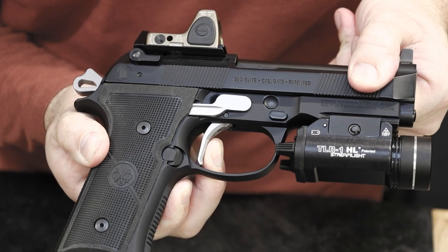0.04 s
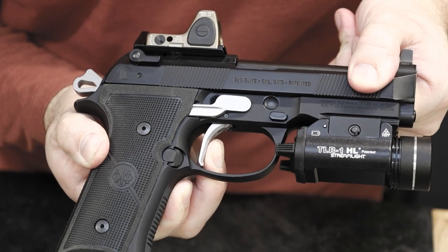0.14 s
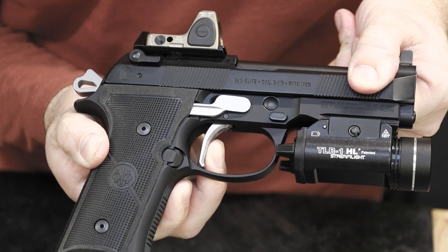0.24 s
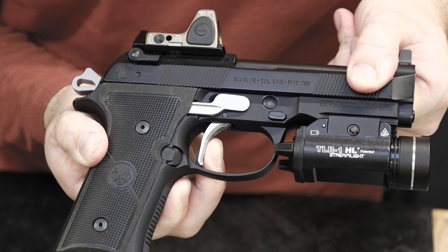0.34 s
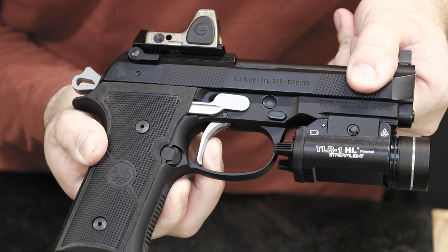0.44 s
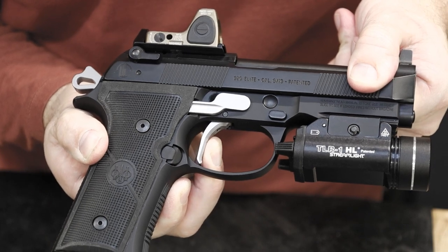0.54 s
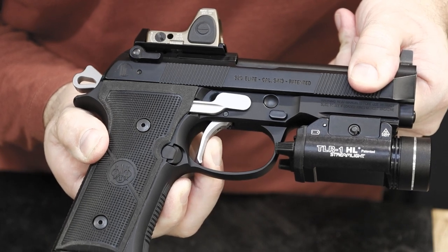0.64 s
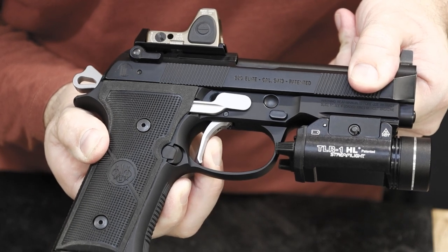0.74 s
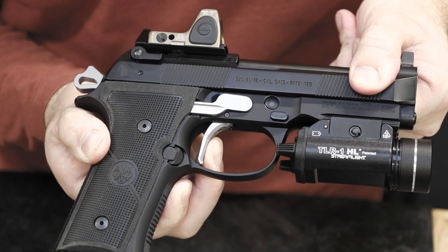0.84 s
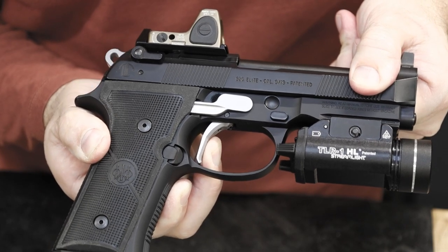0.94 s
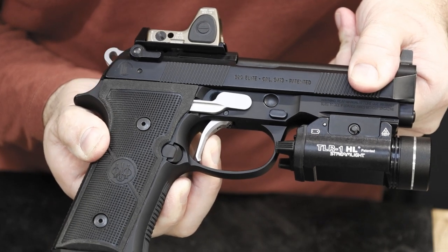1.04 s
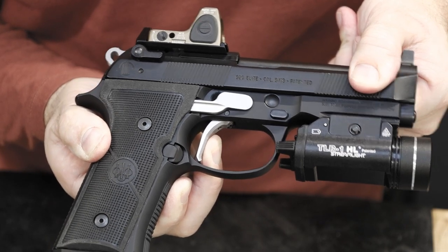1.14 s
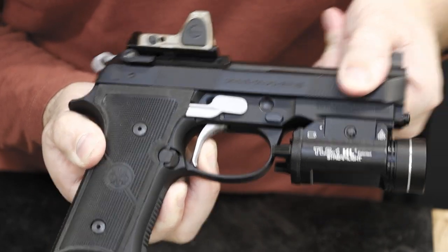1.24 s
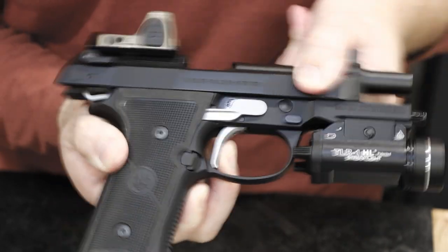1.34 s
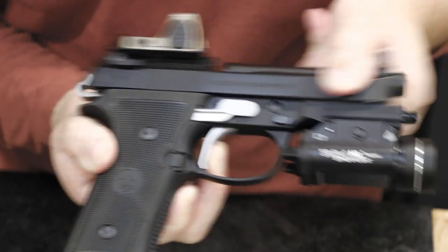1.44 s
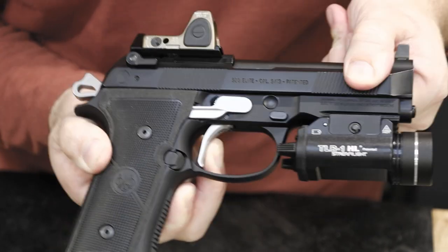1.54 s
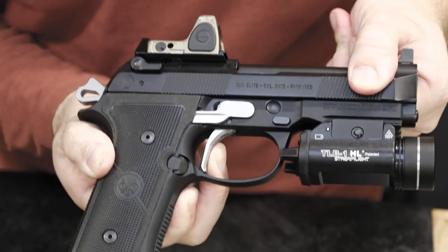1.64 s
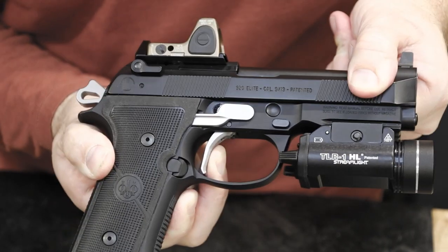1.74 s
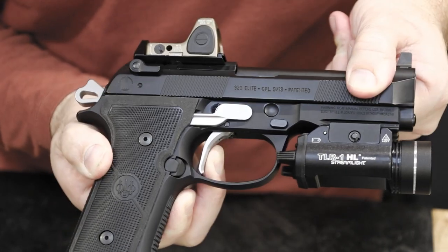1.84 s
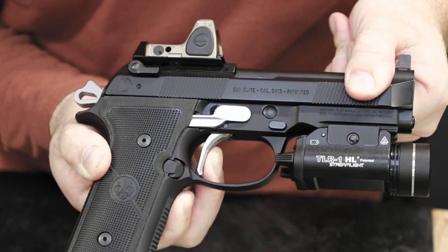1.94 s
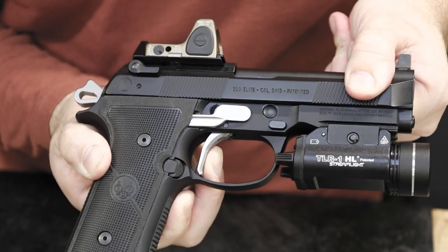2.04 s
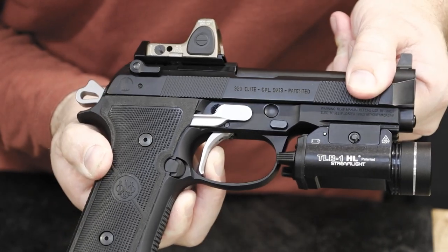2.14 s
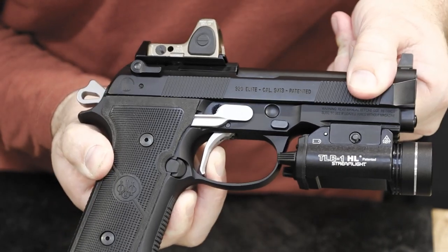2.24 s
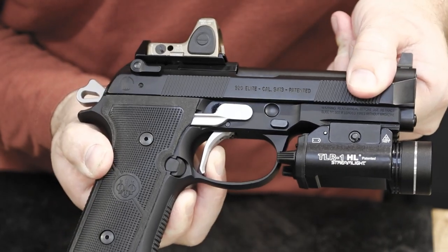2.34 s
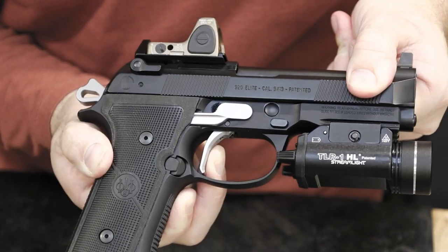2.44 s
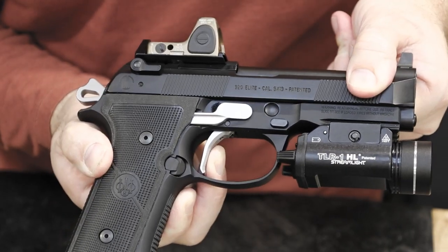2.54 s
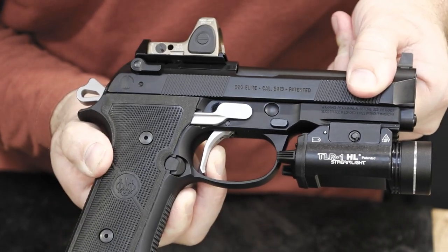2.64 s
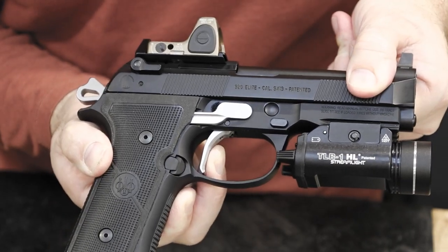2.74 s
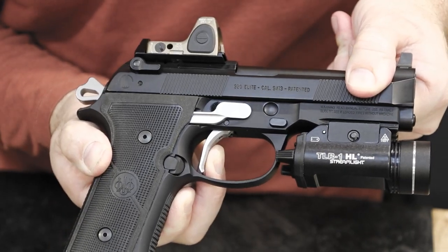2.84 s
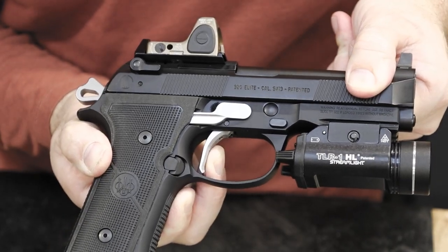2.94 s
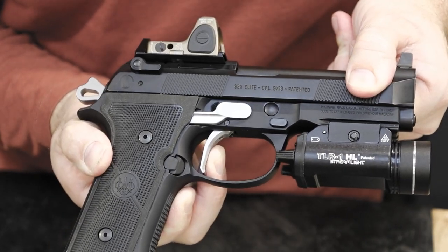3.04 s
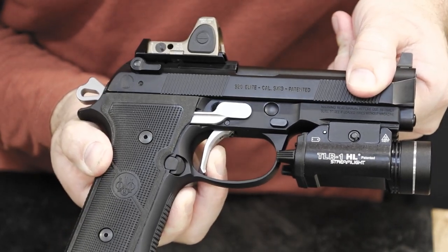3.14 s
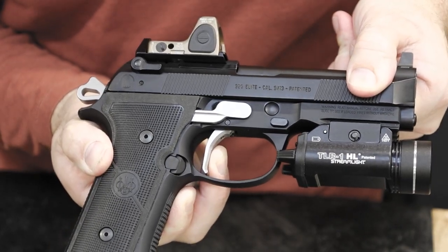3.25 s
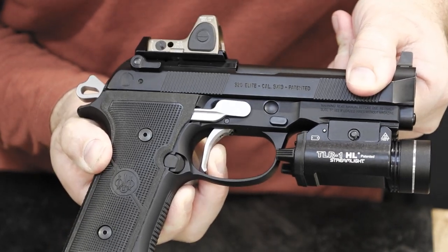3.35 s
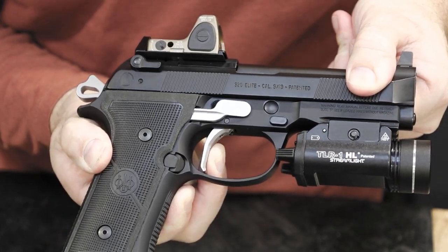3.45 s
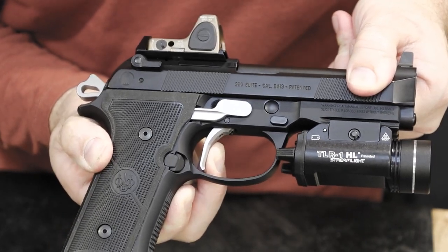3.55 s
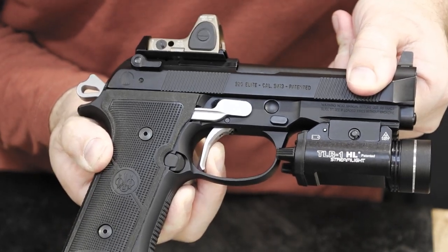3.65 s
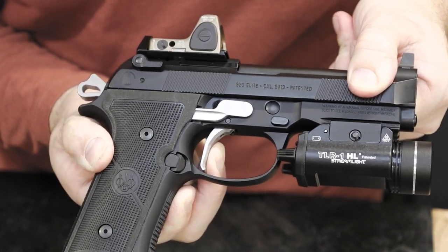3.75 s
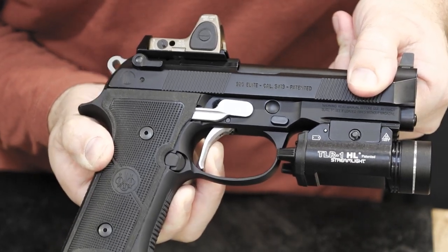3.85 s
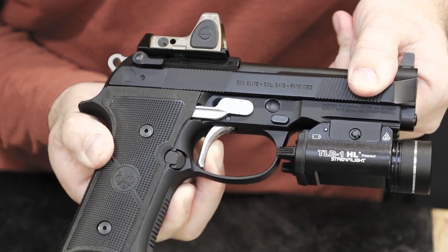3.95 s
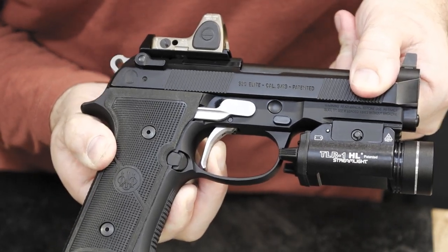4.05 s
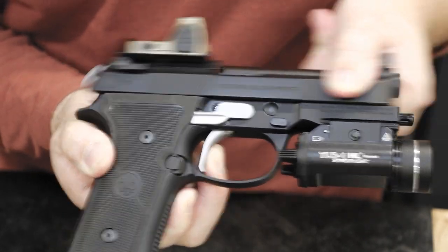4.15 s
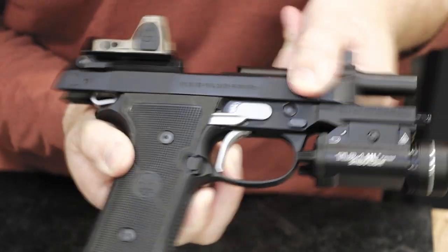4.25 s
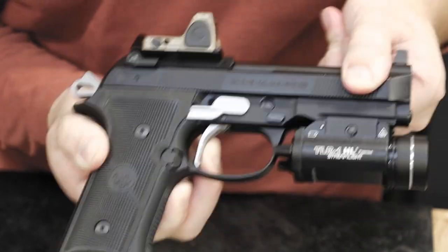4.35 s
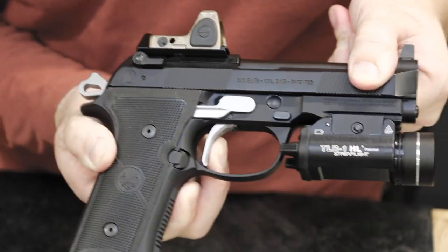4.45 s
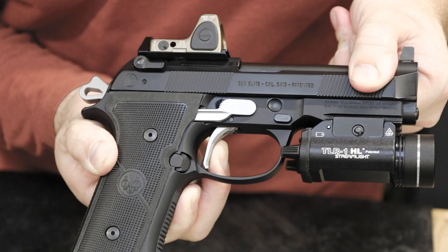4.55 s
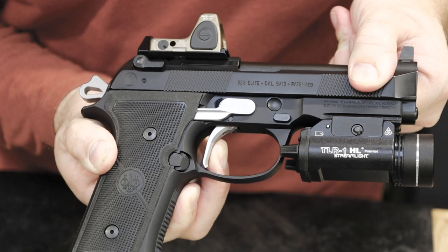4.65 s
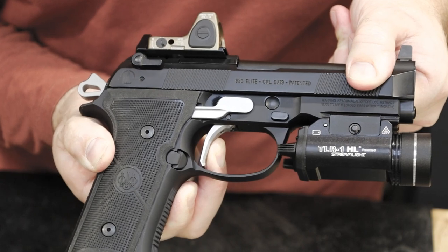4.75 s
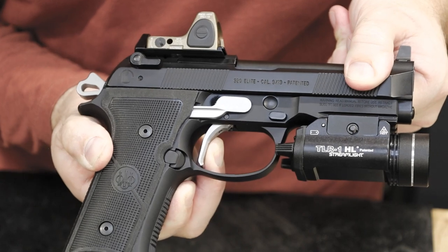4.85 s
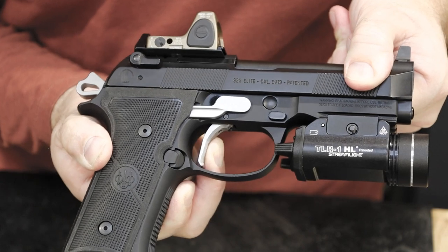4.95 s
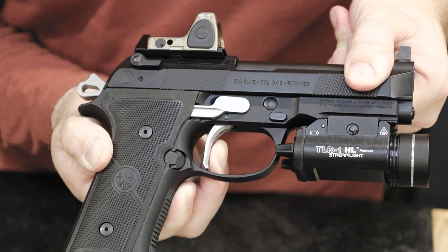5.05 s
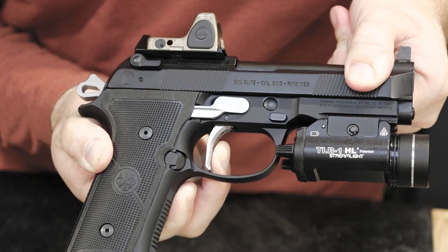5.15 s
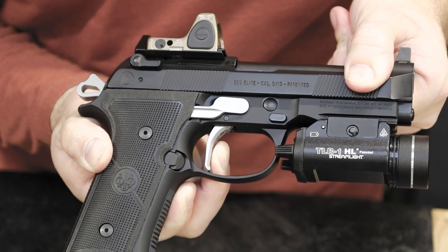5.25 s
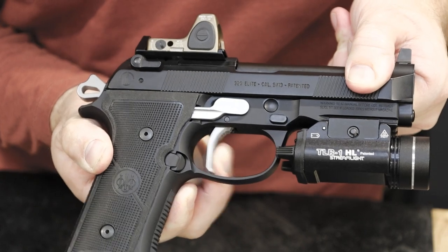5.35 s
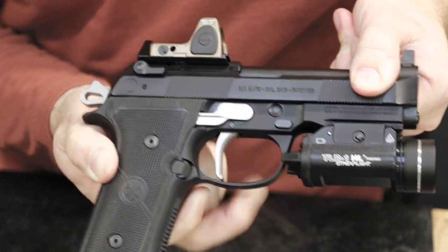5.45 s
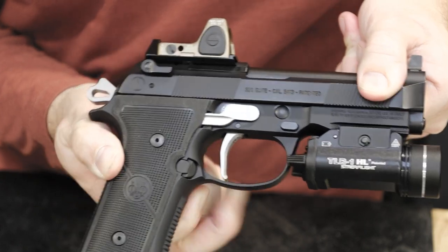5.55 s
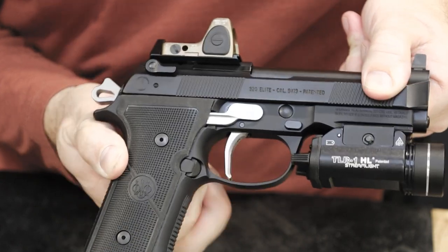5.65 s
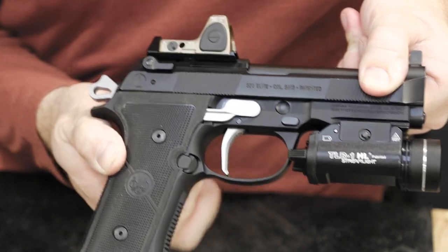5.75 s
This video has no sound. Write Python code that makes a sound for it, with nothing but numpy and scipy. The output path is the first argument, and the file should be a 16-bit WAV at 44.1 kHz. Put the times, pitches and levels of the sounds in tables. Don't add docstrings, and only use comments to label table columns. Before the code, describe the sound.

Close up in a bare room, an unloaded pistol clicks, its hammer snaps, and its slide grinds back and slams shut, ringing over faint hum.

```python
import sys
import numpy as np
from scipy import signal
from scipy.fft import rfft, irfft, next_fast_len
from scipy.io import wavfile
from scipy.ndimage import map_coordinates

SR = 44100
rng = np.random.default_rng(int(sys.argv[2]) if len(sys.argv) > 2 else 0)


def dump_mix(stems):
    frames = np.atleast_2d(stems).T
    limited = np.clip(frames, -1, 1)
    pcm = np.round(limited * 32767).astype(np.int16)
    wavfile.write(sys.argv[1], SR, pcm)


def linear_from_db(decibels):
    return 10 ** (np.asarray(decibels, float) / 20)


N = 255322

# (time [s], strength [dB], pace before, pace after)
FALLS = [
    (1.007, 0.5, 0.96, 1.),
    (3.9269, 0, 0.97, 1.),
]
# (time the barrel unlocks [s], strength [dB], pace before, pace after)
PULLS = [
    (1.3743, -.5, 1, 1),
    (4.2392, .5, .81, .83),
]
# (time the slide shuts [s], strength [dB], pace before, pace after)
SLAMS = [
    (1.557, -1.5, 1, .9),
    (4.4102, 2, .8, 1.12),
]
# (time [s], 2.5-6 kHz level [dB], low band above it [dB], high band above it [dB], blow t60 [s])
RESETS = [
    (0.2871, -8.5, -2, 1.5, .012),
    (0.289, -17.5, -1, -5.5, .008),
    (3.269, -8.5, -2.5, 3, .008),
    (3.2713, -12, -.5, -8.5, .008),
    (5.079, -6, -6, 3.5, .01),
    (5.082, -14, -4, -4, .008),
]
# (time from unlocking [s], then levels and t60 as for the resets)
STOP_HIT = [
    (.0422, -5.5, 1.8, 2.5, .01),
]
# (frequency [Hz], level [dB per Hz])
SLIDE_COLOUR = [(530, -50.5), (900, -15.5), (1400, -10), (2150, -1), (2800, -6), (3600, 2), (4300, 0.5),
                (5100, -5), (5980, -1), (6700, -6.5), (9800, -10.5), (10800, -18.5), (13500, -21.5),
                (15800, -33.5)]
# (frequency [Hz], level [dB per Hz])
LAST_COLOUR = [(590, -45), (1000, -18), (1800, -7.5), (2800, -10), (3360, 3), (4000, -5), (4800, -1),
               (5400, -4.5), (6060, -15), (7290, -10), (15800, -28.5)]


def unit(x):
    return x / np.sqrt(np.mean(x ** 2) + 1e-20)


def along(points, hz):
    f, v = np.transpose(points)
    return np.interp(np.log(hz + 1), np.log(f + 1), v)


def filtered(x, response):
    m = next_fast_len(x.shape[-1] + 8192)
    spectrum = rfft(x, m) * response(np.fft.rfftfreq(m, 1 / SR))
    return irfft(spectrum, m)[..., :x.shape[-1]]


def peak(f, hz, width):
    return 1j * f * width / (hz * hz - f * f + 1j * f * width)


def wobble(rate):
    knots = rng.standard_normal(int(N * rate / SR) + 4)
    return map_coordinates(knots, [np.arange(N) * rate / SR])


def played(pattern, motions):
    return [(s + d * (before if d < 0 else after), db + force_db, *colour)
            for s, force_db, before, after in motions
            for d, db, *colour in pattern]


def contacts(rows, modes, crack_db, rough):
    span = 2048
    s, db, low_db, high_db, t60 = np.transpose(rows)[:, :, None]
    t = np.arange(span) / SR
    rattle = rough * rng.standard_normal((len(rows), span)) * linear_from_db(-60 * t / np.clip(t60, .002, .05))
    rattle[:, 0] = 1
    strike = linear_from_db(0.33 * rng.standard_normal((len(rows), len(modes))))

    def body(f):
        response = linear_from_db(crack_db)
        for k, (hz, width, gain_db) in enumerate(modes):
            response = response + (-1) ** k * linear_from_db(gain_db) * strike[:, k, None] * peak(f, hz, width)
        return response

    rung = filtered(rattle, body)
    heads = []
    for edges in ([950, 2500], [2500, 6000], [6000, 15000]):
        band = signal.sosfilt(signal.butter(3, edges, "band", fs=SR, output="sos"), rung)
        heads.append(band / np.sqrt(np.mean(band[:, :130] ** 2, axis=1, keepdims=True)))
    low, middle, high = heads
    clicks = linear_from_db(db - 3.0) * (linear_from_db(low_db) * low + middle + linear_from_db(high_db) * high)
    at = np.round(s * SR).astype(int) + np.arange(span)
    return np.bincount(at.ravel(), clicks.ravel(), N + span)[:N]


def hammer():
    # (time from the blow [s], 2.5-6 kHz level [dB], low band [dB], high band [dB], t60 [s])
    fall = [
        (-.0088, -19, 0, -5.5, .012),
        (-.0062, -20, 6, 6, .009),
        (-.003, -15, 3, 2, .0075),
        (0, -0.5, -7.5, 3, .015),
    ]
    # (frequency [Hz], width [Hz], level [dB])
    hammer_body = [(1835, 130, 3.5), (3150, 160, -0.5), (4300, 250, 0), (5696, 300, -5), (7400, 780, 2),
                   (9280, 350, -1), (10150, 400, 5), (13716, 680, -12), (13060, 420, -9)]
    # (frequency [Hz], level [dB per Hz])
    hammer_colour = [(530, -49), (900, -18.5), (1010, -17.5), (1440, -6), (1640, -9.5), (1800, -3),
                     (2580, -8.5), (3620, 3.5), (4030, -3), (5840, -1), (6740, -6.5), (9550, -8),
                     (15800, -25.5)]
    blows = contacts(played(fall, FALLS), hammer_body, crack_db=-12, rough=.25)
    return room(blows, hammer_colour, wet_db=4)


def slide_shut():
    # (time from the slam [s], 2.5-6 kHz level [dB], low band [dB], high band [dB], t60 [s])
    closing = [
        (-.0303, -29, -9, -5, .014),
        (-.0252, -22, -5, -3, .012),
        (-.0206, -16, -3, -17, .007),
        (-.0122, -15, 1, -12, .007),
        (-.0094, -10, -3, -11, .008),
        (0, 4, -11, 1, .006),
        (.0044, -7.5, -5, 2, .012),
        (.0088, -10, -4, 1.5, .01),
        (.018, -11, -4, -4, .022),
    ]
    # (frequency [Hz], width [Hz], level [dB])
    shut_modes = [(1865, 270, 4), (3170, 110, -0.5), (3618, 240, -2.5), (4606, 250, 1.5), (5978, 83, -13.5),
                  (6950, 62, 5.5), (8500, 900, 1.5), (10100, 180, 1.5), (13540, 280, -8)]
    blows = contacts(played(closing, SLAMS), shut_modes, crack_db=-5.5, rough=0.49)
    return room(blows, SLIDE_COLOUR, wet_db=-2)


def slide_drawn():
    # (time from unlocking [s], 2.5-6 kHz level [dB], low band [dB], high band [dB], t60 [s])
    unlocking = [
        (-.0323, -33, -8.5, -4, .014),
        (-.0185, -29, 3.5, -4, .008),
        (-.0128, -26, -2, 0, .008),
        (-.01, -13.5, -7.5, -4, .009),
        (0, -3, -6, -1.5, .01),
        (.0121, -11, 0, 4, .011),
        (.0238, -19.5, -3, 1, .013),
        (.0347, -23, -4.5, -2, .012),
    ]
    # (frequency [Hz], width [Hz], level [dB])
    open_modes = [(2030, 170, -2.5), (3268, 190, 5), (3970, 210, -1.5), (5800, 750, -2.5), (7260, 290, 1),
                  (8060, 200, -2.5), (11000, 430, -14.5), (14200, 360, -11.5)]
    # (frequency [Hz], width [Hz], level [dB])
    frame_modes = [(1388, 120, 10), (3330, 580, -4), (5140, 500, -7.5), (7700, 500, -3.5),
                   (11500, 500, -12.5), (14000, 500, -7)]
    pull = contacts(played(unlocking, PULLS), open_modes, crack_db=-6.0, rough=.45)
    stop = contacts(played(STOP_HIT, PULLS), frame_modes, crack_db=-19.5, rough=.12)
    return room(pull + stop + scrape(), SLIDE_COLOUR, wet_db=-5.5)


def scrape():
    # (frequency [Hz], width [Hz], level [dB])
    rail_modes = [(2100, 800, 4.5), (3535, 1000, -3), (7000, 2300, -30.5), (12000, 5000, -25.5)]
    rise_db, fade_s = 19.5, 0.012
    # (start, full, end) from the main blow [s], level [dB]
    pull_grind, slam_grind = (-.034, .004, .042, -22), (-.048, -.016, .028, -23)
    t, level = np.arange(N) / SR, np.zeros(N)
    for (start, full, end, grind_db), motions in ((pull_grind, PULLS), (slam_grind, SLAMS)):
        for s, force_db, before, after in motions:
            knots = s + np.array([start * before, full * before, end * after, end * after + fade_s])
            heights = grind_db + force_db - rise_db * np.array([1, 0, 0, 1])
            level += linear_from_db(np.interp(t, knots, heights, left=-120, right=-120))
    grit = rng.standard_normal(N) * linear_from_db(4.9 * wobble(400))
    return level * unit(filtered(grit, lambda f: sum(linear_from_db(g) * peak(f, c, w) for c, w, g in rail_modes)))


def trigger_reset():
    # (frequency [Hz], width [Hz], level [dB])
    bar_modes = [(613, 180, -4.5), (1100, 67, -5), (1450, 250, 6.5), (1890, 180, 7.5), (2216, 120, 0),
                 (2660, 160, 0), (3338, 133, 7), (4400, 230, -8), (5600, 160, -9), (6330, 310, -4.5),
                 (7270, 150, -13), (10606, 650, -4), (13740, 500, -19)]
    # (frequency [Hz], level [dB per Hz])
    reset_colour = [(590, -44), (1000, -6), (1260, -7.5), (1430, -2.5), (1610, -2.5), (2240, -0.5),
                    (2860, -7), (3290, 2), (4090, -4), (6960, -5), (12100, -22), (15800, -24)]
    reset = contacts(RESETS, bar_modes, crack_db=-9, rough=0.12)
    early = np.arange(N) < 4 * SR
    return room(reset * early, reset_colour, wet_db=-4.5) + room(reset * ~early, LAST_COLOUR, wet_db=-3)


def trigger_taps():
    # (time [s], 2.5-6 kHz level [dB], low band above it [dB], high band above it [dB], t60 [s])
    taps = [
        (5.4696, -27, -12, -11.5, .010),
        (5.497, -48, 3, 2.5, 0.0119),
        (5.537, -53, 6, -8, .009),
        (5.7, -62.5, 1.5, 6, .006),
        (5.7345, -41, 2, -10, 0.0091),
        (5.762, -63, -10, 11.5, 0.0041),
    ]
    # (frequency [Hz], width [Hz], level [dB])
    blade_modes = [(1050, 120, 16.5), (2730, 300, 6), (3340, 180, 13.5), (3850, 150, 12.5), (4430, 270, -1),
                   (5500, 430, -6), (8000, 900, -32), (11900, 1500, -6.5)]
    return room(contacts(taps, blade_modes, crack_db=-5.5, rough=.25), LAST_COLOUR, wet_db=0.5)


def singing():
    top_db = -20
    resets = [(s, -40.5, top_db) for s, *_ in RESETS[::2]]
    falls = [(s, -24.5 + db, top_db) for s, db, *_ in FALLS]
    stops = [(s, -33, top_db) for s, *_ in played(STOP_HIT, PULLS)]
    slams = [(s, -23 + db, -3.5 - 5.1 * db) for s, db, *_ in SLAMS]
    return resets + falls + stops + slams


def barrel():
    # (frequency [Hz], level [dB], t60 [s])
    barrel_modes = [(1410, -9.5, 0.63), (2150, -2, .5), (3350, -5, .5), (3620, -5, .55), (4330, -4, .52),
                    (4900, -7.5, .5), (5960, 1, .46), (13190, -5.5, .28)]
    out, t = np.zeros(N), np.arange(SR * 7 // 10) / SR
    hz, level_db, t60 = np.transpose(barrel_modes)[:, :, None]
    for s, db, top_db in singing():
        drift = np.cumsum(.05 * rng.standard_normal((len(hz), len(t))), axis=1)
        gain = linear_from_db(db + level_db + top_db * (hz > 12000) - 60 * t / t60)
        out[round(s * SR):][:len(t)] += (gain * np.sin(2 * np.pi * hz * t + drift)).sum(0)
    return out


def room(x, colour, wet_db):
    # (delay [s], level [dB])
    walls = [(0.01, -14.5), (.0135, -29), (.019, -21), (.024, -25)]
    # (frequency [Hz], t60 [s])
    room_t60 = [(600, 0.27), (2100, 0.69), (5500, 0.6), (10000, 0.42), (15000, .35)]

    def bounces(f):
        return peak(f, 3100, 4200) ** 2 * sum(linear_from_db(db) * np.exp(-2j * np.pi * f * d) for d, db in walls)

    early = filtered(x, bounces)
    hz, t, z = signal.stft(x, SR, nperseg=256)
    energy = np.mean(np.abs(z) ** 2, axis=0, keepdims=True)
    age = t[None, :400]
    late = age - .1
    decay = linear_from_db(2 * along(colour, hz)[:, None] - 120 * late / along(room_t60, hz)[:, None])
    decay = decay * np.clip(age / 0.0049, 0, 1) ** 2
    decay = decay + linear_from_db(-14.0 - 120 * age / .1) * (hz[:, None] > 6500) * (age > 0)
    power = signal.fftconvolve(energy, decay, axes=1)[:, :len(t)]
    noise = signal.stft(rng.standard_normal(N), SR, nperseg=256)[2]
    tail = signal.istft(noise * np.sqrt(np.abs(power)), SR, nperseg=256)[1][:N]
    return x + early + linear_from_db(wet_db) * tail


def fan():
    # (frequency [Hz], level [dB per Hz])
    air = [(12, -68.5), (20, -44), (49, -15.5), (91, -19.5), (113, -18.5), (154, -17), (286, -10),
           (329, -12.5), (460, -9.5), (644, -17.5), (720, -15), (1190, -19), (6570, -41), (14800, -47.5),
           (16100, -53)]
    # (frequency [Hz], width [Hz], rms level [dB])
    duct_modes = [(201.4, 41, -57), (285.5, 41, -49), (474, 45, -58.5), (748, 180, -59.5)]
    # (frequency [Hz], rms level [dB])
    hum_tones = [(119.5, -60.5), (238, -60)]
    t = np.arange(N) / SR
    mix = linear_from_db(-48.5) * unit(filtered(rng.standard_normal(N), lambda f: linear_from_db(along(air, f))))
    for hz, width, db in duct_modes:
        tone = unit(filtered(rng.standard_normal(N), lambda f: peak(f, hz, width) ** 2))
        mix += linear_from_db(db + 1.7 * wobble(1.8)) * tone
    for hz, db in hum_tones:
        mix += np.sqrt(2) * linear_from_db(db + 1.5 * wobble(3.4)) * np.sin(2 * np.pi * hz * t)
    return mix


def scene():
    action = hammer() + slide_shut() + slide_drawn() + trigger_reset() + trigger_taps()
    return (action + barrel() + fan())[None]


def ducking():
    # (delay [s], depth [dB], hold [s], recovery [s])
    after_fall, after_pull = (0.0019, 12.5, 0.016, .11), (.004, 7.5, .024, 0.11)
    after_slam = (.003, 10, .037, .085)
    t, cut_db = np.arange(N) / SR, np.zeros(N)
    for (delay, db, hold, back), motions in ((after_fall, FALLS), (after_pull, PULLS), (after_slam, SLAMS)):
        for s, force_db, *_ in motions:
            age = t - s - delay
            fall = 1 - np.exp(-np.clip(age, 0, None) / 0.0031)
            recovery = np.clip(1 - (age - hold) / back, 0, 1)
            cut_db = np.maximum(cut_db, (db + 0.67 * force_db) * fall * recovery)
    return cut_db


def band_limit(x):
    return signal.sosfilt(signal.butter(12, 16250, fs=SR, output="sos"), x)


def record(dry):
    x = dry * linear_from_db(-ducking())
    clipped = x / (1 + np.abs(x / .9) ** 8) ** (1 / 8)
    thump = filtered(clipped - x, lambda f: 1 / (1 + (f / 300) ** 4))
    return band_limit(clipped - .6 * thump)


dry = scene()
out = record(dry)
dump_mix(out)
```